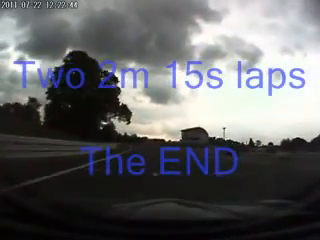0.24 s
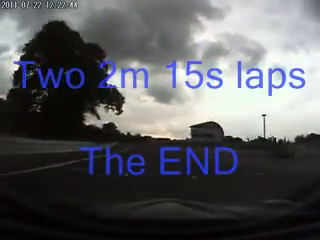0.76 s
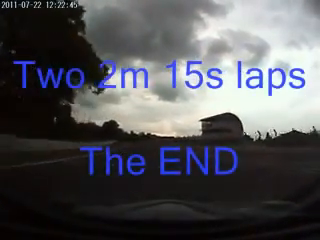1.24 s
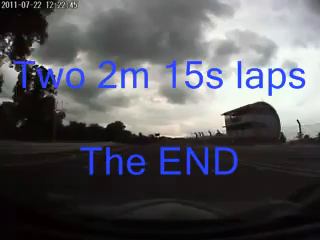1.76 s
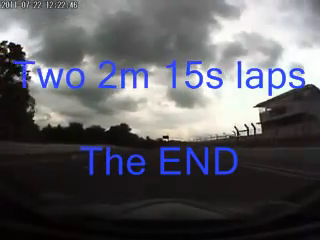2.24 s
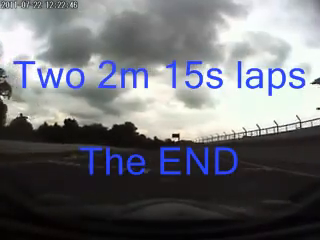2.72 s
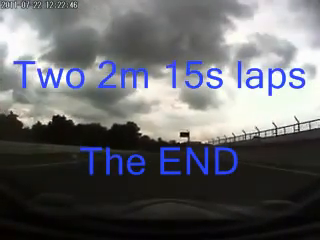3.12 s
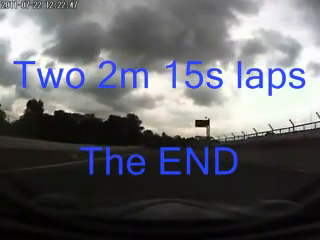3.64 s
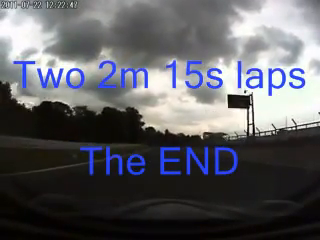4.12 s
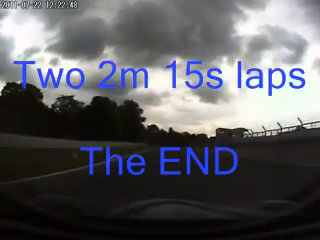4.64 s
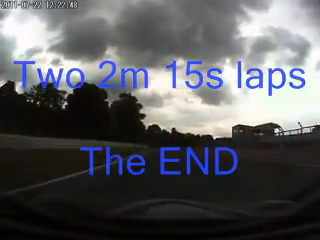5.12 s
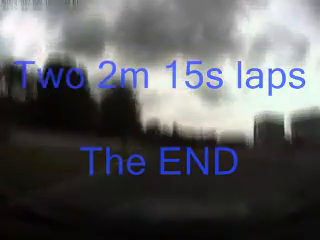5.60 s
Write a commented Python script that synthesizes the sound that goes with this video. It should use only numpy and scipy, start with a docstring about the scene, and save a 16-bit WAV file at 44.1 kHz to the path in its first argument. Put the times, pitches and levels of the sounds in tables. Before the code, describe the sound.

A sports car runs at full throttle on a racetrack, heard from inside the cabin. The engine climbs to the top of a gear, falls away for an upshift after about a second, then returns lower with a thump and slowly rises again. Heavy road and wind rumble and throbbing tyres continue throughout, with a few jolts and a faint high whine. The rumble slightly overloads the microphone.

```python
"""A rotary sports-car engine at full speed on a circuit, heard inside the cabin.
It pulls to the top of one gear, drops for the upshift and pulls again. Two firings a shaft turn boom
in the cabin, exhaust orders cross its resonances, the intake rasps, the gears hum, the alternator whines.
The tyres throb twice a wheel turn under road and wind roar, with a few jolts and small high ticks.
The rumble overloads the microphone."""
import sys
import numpy as np
from scipy import signal
from scipy.fft import rfft, irfft
from scipy.io import wavfile

SR = 44100
rng = np.random.default_rng(int(sys.argv[2]) if len(sys.argv) > 2 else 0)


def dump_mix(stems):
    """Bounce the given channels to the path in sys.argv[1] as a 16-bit WAV at rate SR."""
    frames = np.atleast_2d(stems).T  # one column per channel
    limited = np.clip(frames, -1, 1)  # hard clip at full scale
    pcm = np.round(limited * 32767).astype(np.int16)
    wavfile.write(sys.argv[1], SR, pcm)


N = 258426
T = np.arange(N) / SR
BIN_HZ = np.fft.rfftfreq(N, 1 / SR)


def undb(db):
    """Decibels to gain."""
    return 10 ** (np.asarray(db) / 20)


def lookup(x, table):
    """Linear interpolation of a two-column table at x."""
    return np.interp(x, *np.transpose(table))


def walk(rate_hz):
    """Smooth random drift, spread 1, bandwidth about rate_hz."""
    drift = irfft(rfft(rng.standard_normal(N)) * np.exp(-(BIN_HZ / rate_hz) ** 2), N)
    return drift / np.std(drift)


def colour(x, spectrum):
    """Filter by (Hz, dB) points, then scale to rms 1."""
    hz, db = np.transpose(spectrum)
    gain = undb(np.interp(np.log(np.maximum(BIN_HZ, 1)), np.log(hz), db))
    shaped = irfft(rfft(x) * gain, N)
    return shaped / np.std(shaped)


def angle(hz):
    """Running phase in radians."""
    return 2 * np.pi * np.cumsum(hz) / SR


def tone(phase):
    """Sine of rms 1."""
    return np.sqrt(2) * np.sin(phase)


def blow(age):
    """Swell and decay of a soft blow; age in decay times."""
    return age * np.exp(2 - 2 * age)


# Cabin resonances and nulls. Each row: centre in Hz, width in Hz, lift in dB.
CABIN_MODES = [(391, 12, 7), (454, 5, 11), (503, 28, -5), (524, 6, 4), (533, 6, -5), (559, 28, 14),
               (590, 20, 5), (610, 14, -6), (652, 6, 4), (665, 12, -3), (681, 10, 6), (702, 20, -6),
               (755, 16, 5), (781, 16, 4), (802, 20, 7), (848, 16, 8), (918, 30, 5), (1005, 40, 4),
               (1058, 40, -6), (1103, 22, 10), (1243, 40, 10), (1445, 34, 6), (1580, 50, -8), (1635, 30, 8),
               (2750, 200, 6), (3620, 130, 12)]

def cabin_db(hz):
    """Summed lift of the cabin's resonances at a frequency."""
    return sum(lift / (1 + (2 * (hz - centre) / width) ** 2) for centre, width, lift in CABIN_MODES)


# Road and wind noise. Each row: frequency in Hz, relative density in dB.
ROAD_SPECTRUM = [(8, -24), (20, -3.5), (40, -6), (52, -3.5), (68, -10), (125, -5.5), (170, -17.5),
                 (310, -17), (385, -11.5), (470, -18), (780, -19.5), (1250, -33), (2000, -44), (3800, -51),
                 (5000, -59.5), (10000, -67.5)]

def road_and_wind(wheel_hz, wind_db=-14.5, rumble_db=-11.5, split_hz=200, cabin_share=.12):
    """A patchy surface rumbles; gusty wind roars louder with speed. The cabin faintly colours both."""
    roar_db = wind_db + 6 * np.log2(wheel_hz / wheel_hz.mean()) + .54 * walk(27)
    surface_db = rumble_db + 2 * walk(11)
    cabin_gain = undb(cabin_share * cabin_db(BIN_HZ))
    noise = colour(irfft(rfft(rng.standard_normal(N)) * cabin_gain, N), ROAD_SPECTRUM)
    low = signal.sosfiltfilt(signal.butter(2, split_hz, fs=SR, output="sos"), noise)
    return (noise - low) * undb(roar_db) + low * undb(surface_db)


# Body jolts, the second as the clutch bites.
# Each row: start in seconds, pitch in Hz, level in dB, decay in seconds.
BODY_JOLTS = [(0.228, 123.8, -14, 0.048), (1.471, 52.7, -3.5, 0.033), (3.231, 84.5, -8, 0.054),
              (4.101, 115.7, -19.5, 0.21), (5.031, 114, -14, 0.021)]
# High ticks. The third is a brief high ring as the whine sweeps at the gear change; the rest are trim.
# Each row: start in seconds, lower and upper ring in Hz, level in dB, decay in seconds.
HIGH_TICKS = [(.833, 6300, 9320, -49, .006), (1.488, 2690, 2960, -48, .008), (1.5, 2660, 6070, -53, .035),
              (1.526, 3700, 8950, -46.5, .007), (1.893, 4350, 4800, -41, .006),
              (3.016, 6200, 7100, -45, .006)]

def knocks(grit_share=.7, grit_decay_s=.006):
    """Jolts ring the body low; each high tick is two short rings and a burst of grit."""
    out = np.zeros(N)
    for start_s, hz, db, decay_s in BODY_JOLTS:
        age_s = np.maximum(T - start_s, 0)
        out += undb(db) * blow(age_s / decay_s) * np.sin(2 * np.pi * hz * age_s)
    grit = colour(rng.standard_normal(N), [(500, -30), (3000, -7), (10000, -5), (12000, -32)])
    for start_s, low_hz, high_hz, db, decay_s in HIGH_TICKS:
        age_s = np.maximum(T - start_s, 0)
        rings = np.sin(2 * np.pi * low_hz * age_s) + np.sin(2 * np.pi * high_hz * age_s)
        out += undb(db) * (blow(age_s / decay_s) * rings + grit_share * blow(age_s / grit_decay_s) * grit)
    return out


# Tyre throb. Each row: time in seconds, level in dB before stretch and gain.
THROB_CONTOUR = [(0.0, -9.5), (0.36, -8.5), (0.48, -7), (0.63, -11.5), (0.75, -5.5), (0.93, -11),
                 (1.05, -4), (1.44, -15), (1.62, -6.5), (1.77, -7), (1.95, -5.5), (2.1, -6.5), (2.88, -5.5),
                 (2.97, -8), (3.75, -3.5), (4.89, -6.5), (5.16, -2.5), (5.55, -4), (5.66, -5.5),
                 (5.76, -4.5), (5.85, -3)]
# Tread hum near the tyres' air resonance. Each row: wheel order, level in dB before cabin lift.
TREAD_ORDERS = [(18, -54), (19, -29), (20, -32), (21, -34)]

def tyres(wheel_hz, gain_db=.86, stretch=1.09, tread_rough=.28):
    """The tyres shake the cabin air twice a wheel turn; their tread hums unevenly."""
    turn = angle(wheel_hz)
    contour_db = lookup(T, THROB_CONTOUR)
    mean_db = contour_db.mean()
    throb_db = gain_db + mean_db + stretch * (contour_db - mean_db) + .6 * walk(6.5)
    out = undb(throb_db) * tone(2 * turn + .16 * walk(1.7))
    for order, db in TREAD_ORDERS:
        level = undb(db + cabin_db(order * wheel_hz)) * (1 + tread_rough * walk(8.8))
        out += level * tone(order * turn + walk(2.45))
    return out


# Full-throttle pulls. Each row: clutch home in seconds, lift-off in seconds, shaft turns per wheel turn,
# wheel acceleration in Hz/s, shaft run-down after lift-off in Hz/s.
GEAR_PULLS = [(-1, 1.036, 7.336, .895, 44), (1.553, 5.735, 5.327, .636, 31)]

def wheel_speed(start_hz=17.7):
    """Wheel turns per second: rising evenly in each pull, coasting between."""
    accel_hz_per_s = sum(rate * ((T >= on_s) & (T < off_s)) for on_s, off_s, _, rate, _ in GEAR_PULLS)
    return start_hz + np.cumsum(accel_hz_per_s) / SR


def throttle(on_s, off_s, open_s=.17, shut_s=.014):
    """Opening 0-1: opens as the clutch comes home, snaps shut at lift-off."""
    return np.interp(T, [on_s - open_s, on_s, off_s, off_s + shut_s], [0, 1, 1, 0])


def overrun():
    """1 with the throttle shut, 0 in a pull."""
    return 1 - sum(throttle(on_s, off_s) for on_s, off_s, *_ in GEAR_PULLS)


def load_db(shut_db=-18):
    """Engine load: full in a pull, low on the overrun."""
    return shut_db * overrun()


# Small wavers in engine and whine pitch. Each row: time in seconds, shaft speed offset in Hz.
PITCH_WAVER = [(0.02, 0.02), (0.11, 0.5), (0.18, 0.48), (0.26, 0.1), (1.04, 0), (1.17, -0.97), (1.42, -0.2),
               (1.64, -0.25), (1.71, 0.4), (1.8, -0.35), (2.05, 0.05), (2.51, 0.06), (2.56, -0.14),
               (2.7, 0.08), (3.04, -0.16), (3.08, -0.02), (3.44, -0.32), (3.61, 0.16), (3.88, -0.28),
               (3.96, -0.02), (4.02, -0.32), (4.24, 0.02), (4.33, -0.26), (4.4, 0.1), (4.53, -0.18),
               (4.73, 0.3), (4.82, -0.08), (4.9, 0.16), (5.15, 0.25), (5.48, 0.05), (5.57, -0.17),
               (5.67, 0.05), (5.77, -0.02), (5.84, -0.24)]

def shaft_speed(wheel_hz, clutch_s=.155, rock_hz=5.7, swing_hz=3.6, rock_decay_s=.1):
    """Shaft turns per second: geared to the wheels, running down off throttle, rocking once clutched."""
    shaft_hz = np.zeros(N)
    for on_s, off_s, ratio, _, run_down in GEAR_PULLS:
        age_s = np.maximum(T - on_s, 0)
        rock = swing_hz * np.exp(-age_s / rock_decay_s) * np.sin(2 * np.pi * rock_hz * age_s)
        target_hz = ratio * wheel_hz - rock - run_down * np.maximum(T - off_s, 0)
        grip = np.clip(1 + (T - on_s) / clutch_s, 0, 1) ** 2
        shaft_hz += grip * (target_hz - shaft_hz)
    return shaft_hz + lookup(T, PITCH_WAVER)


def faint_tones(shaft_hz, start_s=.95, end_s=1.29, edge_s=.03, steady_hz=7810, whine_order=49.6):
    """A faint, thin, steady tone near 7.8 kHz; a faint whine falls with the shaft off throttle."""
    gate = np.interp(T, [start_s, start_s + edge_s, end_s - edge_s, end_s], [0, 1, 1, 0])
    steady = undb(-58 + 2 * walk(20)) * gate * tone(2 * np.pi * steady_hz * T + .5 * walk(20))
    whine = undb(-66 + 2 * walk(20)) * overrun() * tone(whine_order * angle(shaft_hz))
    return steady + whine


# Gear hum, one row a pull. Each row: shaft order, level at clutch home in dB, slope in dB/s.
GEAR_ORDERS = [(13 / 3, -31.5, 0), (4.92, -34.5, -2.6)]

def gearbox(shaft_hz, rough=.44):
    """Each gear hums unevenly at its own shaft order while under load."""
    hum = np.zeros(N)
    for (on_s, off_s, *_), (order, db, db_per_s) in zip(GEAR_PULLS, GEAR_ORDERS):
        level = undb(db + db_per_s * (T - on_s)) * throttle(on_s, off_s) * (1 + rough * walk(14))
        hum += level * tone(order * angle(shaft_hz) + .34 * walk(4.9))
    return hum


# Alternator housing's radiation of the whine. Each row: frequency in Hz, level in dB.
WHINE_RESPONSE = [(7300, -37.5), (7680, -36.5), (7850, -45), (7940, -54), (8100, -44), (8550, -54),
                  (9100, -45), (9720, -56), (9985, -43), (10040, -64)]
# The same for its octave. Each row: frequency in Hz, relative level in dB.
OCTAVE_RESPONSE = [(15100, -60), (15400, -72), (15560, -62), (15720, -51), (16100, -47), (16600, -51),
                   (17000, -51), (17500, -61), (19150, -63), (19500, -46.5), (19780, -50.5), (20200, -54)]

def alternator(shaft_hz, order=75.15, slip=.0002, waver_db=1.5, mode_hz=15950, mode_width_hz=22):
    """Belt-driven whine and octave; abrupt speed changes chatter the belt and ring a housing mode."""
    whine_hz = order * shaft_hz * (1 + slip * walk(6))
    accel_hz_per_s = np.abs(np.gradient(shaft_hz) * SR)
    chatter_rad = .0015 * accel_hz_per_s * walk(150)
    phase = angle(whine_hz) + .27 * walk(40) + chatter_rad
    whine = undb(lookup(whine_hz, WHINE_RESPONSE) + waver_db * walk(30)) * tone(phase)
    octave_db = 3.5 + .08 * load_db() + lookup(2 * whine_hz, OCTAVE_RESPONSE) + waver_db * walk(33)
    octave = undb(octave_db) * tone(2 * phase)
    jolt = np.minimum(accel_hz_per_s / 110, 1) ** 2
    mode = signal.iirpeak(mode_hz, mode_hz / mode_width_hz, fs=SR)
    ring = signal.lfilter(*mode, octave * jolt)
    return whine + undb(-5 * jolt) * octave + 2.5 * ring


def panel_shake(shaft_hz, turn, peak_db=-16, peak_hz=122, width_hz=20):
    """Shaft unbalance shakes the resonant body panels, on or off throttle."""
    response = 1 / np.hypot(1, 2 * (shaft_hz - peak_hz) / width_hz)
    return undb(peak_db) * response * (1 + .23 * walk(3.6)) * tone(turn)


# Intake rasp. Each row: frequency in Hz, relative level in dB.
RASP_SPECTRUM = [(300, -20), (900, -1), (1700, 0), (2400, 1), (3000, -2), (3330, -10), (3620, -1),
                 (3900, -12), (4600, -21), (6350, -18), (7200, -26), (10000, -34)]
# Intake at resonance. Each row: frequency in Hz, relative level in dB.
FLARE_SPECTRUM = [(400, -20), (1250, 3), (1480, -4), (1660, 0), (2050, -10), (2280, 1), (2480, 2),
                  (2720, -10), (2950, -2), (3150, -14), (3750, -14), (4300, -24), (10000, -38)]

def intake(shaft_hz, turn, rasp_db=-40, db_per_doubling=23, flare_db=-36.5, flare_shaft_hz=136.05):
    """Air rushes with each firing; the rasp grows with speed and flares where the intake resonates."""
    air = rng.standard_normal(N) * (1 + .55 * np.cos(2 * turn))
    rasp_gain = undb(rasp_db + db_per_doubling * np.log2(shaft_hz / flare_shaft_hz))
    flare_gain = undb(flare_db) * np.exp(-((shaft_hz - flare_shaft_hz) / .8) ** 2)
    return rasp_gain * colour(air, RASP_SPECTRUM) + flare_gain * colour(air, FLARE_SPECTRUM)


# Cabin boom. Each row: firing rate in Hz, full-load level in dB.
BOOM_RESPONSE = [(196, -22.5), (203.5, -15.4), (210, -20), (212, -30), (219, -28), (227, -31), (260, -16),
                 (273, -12)]

def firing_boom(shaft_hz, turn, rough=.056):
    """Two firings a shaft turn boom in the cabin."""
    return undb(lookup(2 * shaft_hz, BOOM_RESPONSE)) * (1 + rough * walk(25)) * tone(2 * turn)


# Exhaust note. Each row: shaft order, full-load level in dB before cabin lift.
EXHAUST_ORDERS = [(3, -35.5), (4, -32), (5, -34), (6, -28.2), (7, -37), (8, -39.3), (9, -47.5), (10, -41.7),
                  (11, -49.5), (12, -44.7), (13, -53), (14, -57), (15, -58)]

def exhaust(shaft_hz, turn, rough=.14):
    """Orders waver with uneven firings and swell as they cross cabin resonances."""
    note = np.zeros(N)
    for order, db in EXHAUST_ORDERS:
        level = undb(db + cabin_db(order * shaft_hz)) * (1 + rough * walk(15))
        note += level * tone(order * turn + rng.uniform(0, 2 * np.pi))
    return note


def engine(shaft_hz):
    """One shaft angle drives all parts; exhaust, boom and intake follow the load."""
    turn = angle(shaft_hz) + .015 * walk(25)
    firing = exhaust(shaft_hz, turn) + firing_boom(shaft_hz, turn)
    shake = panel_shake(shaft_hz, turn)
    return undb(load_db()) * (firing + intake(shaft_hz, turn)) + shake


def scene():
    """Mono mix in the cabin."""
    wheel_hz = wheel_speed()
    shaft_hz = shaft_speed(wheel_hz)
    mix = engine(shaft_hz) + gearbox(shaft_hz) + alternator(shaft_hz) + faint_tones(shaft_hz)
    return (mix + tyres(wheel_hz) + road_and_wind(wheel_hz) + knocks())[None]


# Gain after the overload. Each row: time in seconds, gain in dB.
OUTPUT_GAIN = [(0, -.3), (5.3, -.3), (5.86, -1.9)]

def record(dry, knee=12, cutoff_hz=10030):
    """Rumble crests overload the input and chop the whine; half-rate sampling mirrors its octave down."""
    clipped = dry / (1 + np.abs(dry) ** knee) ** (1 / knee)
    half_rate = 2 * clipped * (np.arange(N) % 2 == 0)
    lowpass = signal.ellip(12, .1, 80, cutoff_hz, fs=SR, output="sos")
    return signal.sosfilt(lowpass, half_rate * undb(lookup(T, OUTPUT_GAIN)))


dry = scene()
out = record(dry)
dump_mix(out)
```